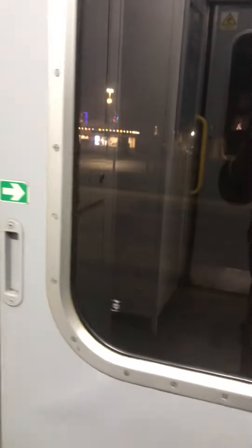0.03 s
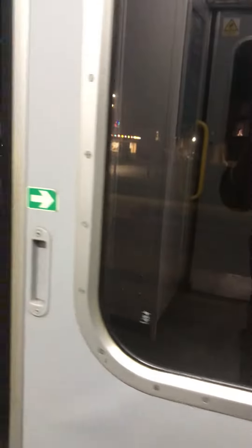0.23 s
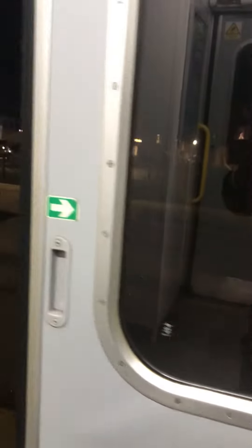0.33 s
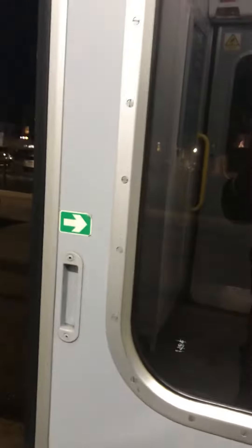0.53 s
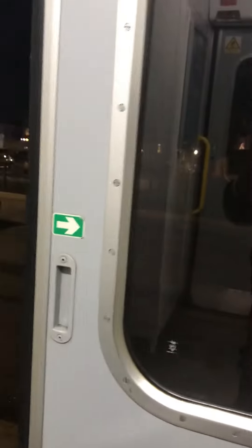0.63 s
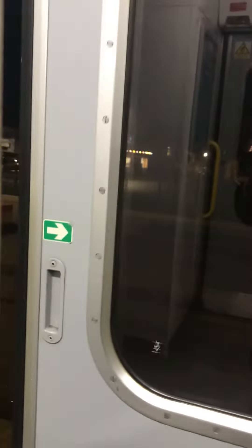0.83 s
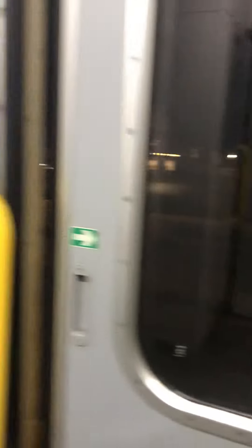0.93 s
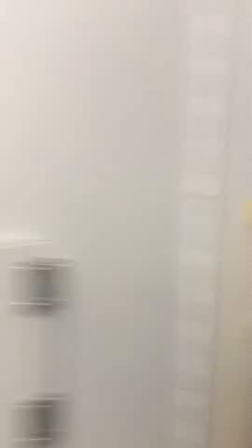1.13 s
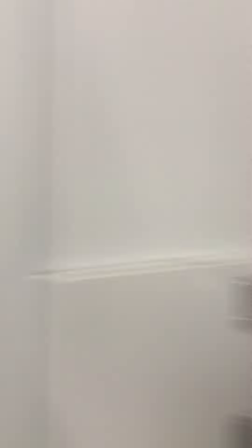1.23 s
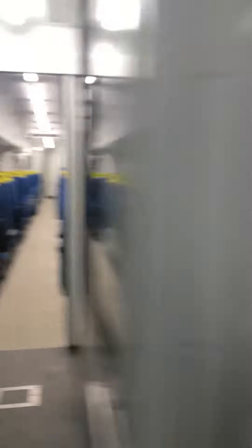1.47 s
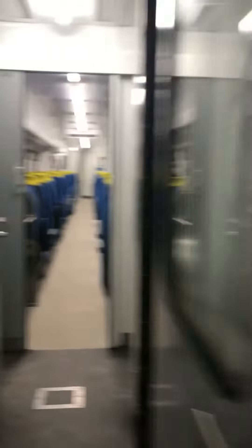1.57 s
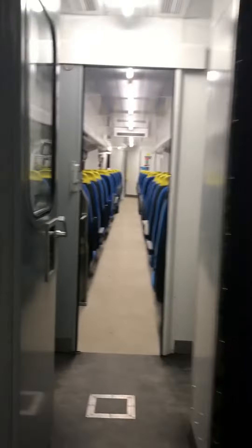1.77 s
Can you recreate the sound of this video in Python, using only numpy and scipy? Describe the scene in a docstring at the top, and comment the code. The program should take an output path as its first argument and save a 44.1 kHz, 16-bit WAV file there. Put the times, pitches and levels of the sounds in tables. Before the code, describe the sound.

Powered train door hisses, clunks and slams closed over the idling train's rumble.

```python
"""Train vestibule door closing

A powered door slides shut in a hiss of air from its drive, over the rumble and drone of the idling train.
It scuffs along its track, clunks, knocks once more, then squeezes its seal and slams home; the latch
rattles, the air is choked off and the train sounds quieter. Blows are bursts of coloured noise with a
short room tail; the metal and the door panel ring on in damped modes."""
import sys
import numpy as np
from scipy import signal
from scipy.fft import rfft, irfft, next_fast_len
from scipy.io import wavfile
from scipy.ndimage import map_coordinates

SR = 44100
rng = np.random.default_rng(int(sys.argv[2]) if len(sys.argv) > 2 else 0)


def wav_out(sig):
    """Save sig, one row per channel (or a flat mono array), as 16-bit PCM at SR to the path in sys.argv[1]."""
    wavfile.write(sys.argv[1], SR, np.round(np.clip(np.atleast_2d(sig).T, -1, 1) * 32767).astype(np.int16))


N = 79380
T = np.arange(N) / SR


def amp(db):
    """Decibels to gain."""
    return 10 ** (np.asarray(db) / 20)


def unit(x):
    """Scale to rms 1."""
    return x / np.sqrt(np.mean(x ** 2) + 1e-20)


def along(points, hz):
    """Read (f/Hz, value) points on a log frequency axis."""
    f, v = np.transpose(points)
    return np.interp(np.log(hz + 1), np.log(f + 1), v)


def curves(rows):
    """One envelope for each column after the time."""
    times, *columns = np.transpose(rows)
    return [np.interp(T, times, column) for column in columns]


def wobble(rate):
    """A smooth random curve, rate knots a second."""
    return map_coordinates(rng.standard_normal(400), [T * rate + 2], mode="wrap")


def filtered(x, response):
    """Filter x by a gain given as a function of frequency."""
    size = next_fast_len(N + SR // 2)
    return irfft(rfft(x, size) * response(np.fft.rfftfreq(size, 1 / SR)), size)[:N]


def noise(colour):
    """Noise of rms 1; the colour's levels set only the shape of its spectrum."""
    return unit(filtered(rng.standard_normal(N), lambda hz: amp(along(colour, hz))))


def at(s, x):
    """Delay x by s seconds."""
    return np.pad(x, (round(s * SR), 0))[:N]


def train():
    """The idling train: rumble, roar and engine drone, quieter once the door is shut, and a faint hiss."""
    # swells of the deep rumble: t/s, level/dB
    rumble_level = [(0, -29.5), (.3, -25.5), (.6, -30.5), (.88, -24), (1.05, -33), (1.25, -23.5),
                    (1.58, -35.5), (1.8, -34)]
    # rumble spectrum: f/Hz, level/dB
    rumble_colour = [(18, -18), (30, -24), (40, 1), (58, 0.5), (80, -1.5), (120, -6.5), (160, -15.5),
                     (400, -57), (1000, -110)]
    # swells of the low-mid roar: t/s, level/dB
    roar_level = [(0, -38.5), (.1, -35), (.22, -41), (.4, -32), (.65, -40), (1.0, -39.5), (1.25, -37.5),
                  (1.58, -45), (1.8, -43)]
    # roar spectrum: f/Hz, level/dB
    roar_colour = [(80, -19), (160, -2), (240, -2.5), (420, -10.5), (620, -10), (850, -18), (1300, -21.5),
                   (2200, -32.5), (4000, -39), (8000, -56), (16000, -70)]
    # swells of the engine drone: t/s, level/dB
    drone_level = [(0, -41), (.12, -28.5), (.2, -32), (.39, -19), (.47, -32.5), (.75, -29), (1.03, -37),
                   (1.2, -29.5), (1.6, -55), (1.8, -60)]
    # cabin hiss, dipping after the slam: t/s, level/dB
    hiss_level = [(1.3, -56), (1.52, -68), (1.65, -56.5), (1.8, -56.5)]
    # cabin hiss spectrum: f/Hz, level/dB
    hiss_colour = [(1000, 2.5), (3500, 0.5), (5500, -6.5), (10000, -8.5), (15000, -15)]
    drone_hz, waver_db, drift_rad = 96.9, 3.5, 0.28
    drone_gain = np.sqrt(2) * amp(curves(drone_level)[0] + waver_db * wobble(22.1))
    drone = drone_gain * np.sin(2 * np.pi * drone_hz * T + drift_rad * wobble(14))
    rumble = amp(curves(rumble_level)[0]) * noise(rumble_colour)
    roar = amp(curves(roar_level)[0]) * noise(roar_colour)
    hiss = amp(curves(hiss_level)[0]) * noise(hiss_colour)
    return rumble + roar + drone + hiss


def wall_reflections(x):
    """Add eight close reflections off the vestibule's panels; the sum has rms 1."""
    delays_s = rng.uniform(.0008, .012, size=8)
    return unit(x + amp(-15) * sum(at(s, x) for s in delays_s))


def air_rush():
    """Air hisses from the door drive, duller as the pressure falls, until the seal chokes it."""
    # envelopes of the rush: t/s, body level/dB, fizz level/dB
    rush_levels = [(0, -40.5, -38.5), (.28, -41.5, -39.5), (.42, -38.5, -39.5), (.5, -40.5, -41),
                   (.66, -48.5, -48), (.88, -43, -45), (1.05, -46.5, -50), (1.22, -51, -57)]
    # spectrum of the hiss's body: f/Hz, level/dB
    body_colour = [(900, -4), (1500, -16), (2500, -5.5), (3600, -1), (5500, 1.5), (7000, -1.5), (7800, -15),
                   (11000, -38)]
    # spectrum of the fizz on top: f/Hz, level/dB
    fizz_colour = [(4000, -37), (7000, -9), (8300, 0.5), (9600, 1), (10500, -5), (12500, -1.5), (15500, -7)]
    # narrow whistles of the vent: f/Hz, half-width/Hz, relative level/dB
    vent_ports = [(5360, 40, -11), (7400, 87, -13.5)]
    sealed_s, choke_db_per_s, flutter_db = 1.36, 115, 1.2
    whistles = np.zeros(N)
    for hz, width, db in vent_ports:
        band = filtered(rng.standard_normal(N), lambda f: 1 / (1 + ((f - hz) / width) ** 2))
        whistles += amp(db) * unit(band)
    body = wall_reflections(noise(body_colour)) + amp(-2.5) * whistles
    fizz = wall_reflections(noise(fizz_colour))
    body_db, fizz_db = curves(rush_levels)
    choke_db = -choke_db_per_s * np.maximum(T - sealed_s, 0)
    return amp(choke_db + flutter_db * wobble(25.6)) * (amp(body_db) * body + amp(fizz_db) * fizz)


def friction(rubs, colour, grain_db):
    """Rubbing: grainy noise that swells to a peak and dies away at each rub."""
    swell = sum(amp(db) * np.exp(-np.maximum((s - T) / rise, (T - s) / fall))
                for s, db, rise, fall in rubs)
    return swell * unit(noise(colour) * amp(grain_db * wobble(210)))


def track_scuffs():
    """The sliding door rubs briefly on its track."""
    # scuffs along the travel: t/s, level/dB, rise/s, fall/s
    scuffs = [(.296, -35.5, .004, .008), (.328, -29, 0.0075, 0.032), (.755, -39, 0.018, 0.05),
              (1.175, -38.5, .006, .025), (1.21, -39.5, 0.0075, .02)]
    # scuff spectrum: f/Hz, level/dB
    scuff_colour = [(120, -5), (300, 5), (550, -3.5), (900, -6), (3500, -10.5), (8000, -15), (15000, -24)]
    return friction(scuffs, scuff_colour, grain_db=1.0)


def blow(colour, attack_s, hold_s, t60, room_db):
    """A contact: a noise burst stands for its dense resonances, then the vestibule's tail answers."""
    # the vestibule's reverb time: f/Hz, t60/s
    room_t60 = [(100, 0.59), (400, 0.58), (1500, 0.36), (4000, 0.38), (8000, 0.34), (15000, 0.28)]
    direct = noise(colour) * amp(-60 * np.maximum(T - hold_s, 0) / t60)
    hz, t, bands = signal.stft(noise(colour), SR, nperseg=256)
    band_decay = amp(-60 * t / along(room_t60, hz)[:, None])
    tail = signal.istft(bands * band_decay, SR, nperseg=256)[1][:N]
    return (direct + amp(room_db) * tail) * (1 - np.exp(-T / attack_s))


def ring(modes, attack_s, wander_rad):
    """A struck part rings in damped modes whose phases wander a little."""
    tones = np.zeros(N)
    for hz, db, t60 in modes:
        phase = 2 * np.pi * hz * T + wander_rad * wobble(min(hz / 6, 150))
        tones += amp(db - 60 * T / t60) * np.sin(phase)
    return tones * (1 - np.exp(-(T / attack_s) ** 2))


def clunk():
    """The mechanism strikes: metal rings, the door leaf booms, and a short bright spit follows."""
    # impact spectrum: f/Hz, level/dB
    strike_colour = [(100, -16), (260, -1.5), (400, -5), (500, 2), (650, -6.5), (950, -4.5), (1280, -0.5),
                     (1800, -3), (2100, -10.5), (2400, 0.5), (2900, -4), (3400, -17), (5000, -16),
                     (6500, -32), (15000, -39)]
    # modes of the mechanism's metal: f/Hz, level/dB, t60/s
    metal_modes = [(1165, -21, 0.21), (1241, -17, 0.14), (1282, -15, 0.13), (1334, -16, 0.11),
                   (1630, -22.5, 0.13), (1943, -22, 0.16), (2205, -20, 0.12), (2648, -12, 0.14),
                   (2660, -11, .09), (2652, -21, 0.3), (2745, -16, 0.18), (3654, -34.5, 0.27),
                   (5320, -23, .12)]
    # modes of the door leaf: f/Hz, level/dB, t60/s
    leaf_modes = [(97.57, -5.5, 0.51), (167.8, -22, 0.49), (265.6, -14.5, 0.2), (284, -17.5, 0.23),
                  (503, -16, 0.18), (545, -22, .22), (868, -22.5, 0.24)]
    # spit spectrum: f/Hz, level/dB
    spit_colour = [(3000, -13), (6300, -4), (7300, 5.5), (8300, -4), (9300, 2), (10500, -7), (13500, 1),
                   (15500, -6)]
    clunk_s, spit_s = .5095, .559
    strike = amp(-12.5) * blow(strike_colour, attack_s=.0018, hold_s=.01, t60=.072, room_db=-9)
    metal = ring(metal_modes, attack_s=.004, wander_rad=.55)
    boom = ring(leaf_modes, attack_s=.015, wander_rad=.12)
    spit = amp(-26) * blow(spit_colour, attack_s=.00091, hold_s=.0027, t60=.032, room_db=-8)
    return at(clunk_s, strike + metal + boom) + at(spit_s, spit)


def knock():
    """A lighter metal knock further along the travel."""
    # impact spectrum: f/Hz, level/dB
    strike_colour = [(150, -1), (400, -12.5), (780, -17.5), (1000, 0), (1330, -15), (1680, 0.5),
                     (2200, -12), (2700, -8.5), (3200, -22), (4100, -19), (5500, -21.5), (7000, -31),
                     (15000, -34)]
    # modes of the knocked metal: f/Hz, level/dB, t60/s
    metal_modes = [(1012, -22.5, 0.19), (1038, -22.5, .13), (1654, -18.5, 0.12), (1759, -23.5, 0.18),
                   (1810, -24, 0.21), (2690, -36, 0.19)]
    knock_s = .8088
    strike = amp(-22) * blow(strike_colour, attack_s=.00065, hold_s=.011, t60=.11, room_db=-8)
    metal = ring(metal_modes, attack_s=.004, wander_rad=.42)
    return at(knock_s, strike + metal)


def seal_squeeze():
    """The rubber seal rubs as it is squeezed just ahead of the slam."""
    # squeezes of the seal: t/s, level/dB, rise/s, fall/s
    squeezes = [(1.234, -30.5, 0.013, .03), (1.257, -16.5, 0.0061, .004)]
    # spectrum of the rubbing rubber: f/Hz, level/dB
    rubber_colour = [(300, -5.5), (700, -8.5), (1000, -1.5), (1500, -7), (2000, -16), (4000, -24),
                     (12000, -41)]
    return friction(squeezes, rubber_colour, grain_db=1.5)


def slam():
    """The door cracks against the frame, thuds and shudders, then rocks back against it and settles."""
    # the door edge meeting the frame: t/s, level/dB
    edge_hits = [(1.2582, -7), (1.2620, -10)]
    # spectrum of the edge's crack: f/Hz, level/dB
    crack_colour = [(400, -23), (900, -8), (1350, 5), (2000, 2.5), (2600, -18), (4000, -22), (8000, -26),
                    (15000, -36)]
    # main impact spectrum: f/Hz, level/dB
    strike_colour = [(100, 2), (300, 2.5), (480, 0.5), (650, -5), (950, -4), (1350, -1.5), (2000, -9),
                     (2700, -11), (4000, -15.5), (5300, -24), (7500, -23.5), (11000, -29), (15000, -41)]
    # spectrum of the low thud: f/Hz, level/dB
    thud_colour = [(60, -14), (130, -8.5), (200, 5.5), (310, -0.5), (420, -9.5), (600, -14), (800, -16),
                   (2000, -44), (5000, -90)]
    # modes of the slammed panel: f/Hz, level/dB, t60/s
    panel_modes = [(36.3, -12, 0.63), (53.24, -6, 0.49), (87.3, -7.5, .38), (166.7, -20, 0.57),
                   (196.7, -10.5, .36), (254.5, -16.5, 0.41), (334.3, -14.5, 0.31), (492, -18.5, 0.34),
                   (688, -26, 0.41), (871, -24, .24), (1161, -25, 0.46), (1450, -29, 0.19),
                   (1630, -24.5, 0.32), (1750, -27, 0.34)]
    slam_s, settle_s = 1.2575, 1.4
    cracks = np.zeros(N)
    for s, db in edge_hits:
        crack = blow(crack_colour, attack_s=.00037, hold_s=.0012, t60=.011, room_db=-22)
        cracks += at(s, amp(db) * crack)
    strike = amp(-15) * blow(strike_colour, attack_s=.003, hold_s=.011, t60=.066, room_db=-3)
    thud = amp(-17) * blow(thud_colour, attack_s=.005, hold_s=.03, t60=.17, room_db=.5)
    shudder = ring(panel_modes, attack_s=.036, wander_rad=.36)
    settle = amp(-13) * ring(panel_modes, attack_s=.025, wander_rad=.79)
    return cracks + at(slam_s, strike + thud + shudder) + at(settle_s, settle)


def latch_rattle():
    """The latch bounces, each contact a sharp tick, a tinny clack and the plate singing on."""
    # latch bounces: t/s, clack and plate level/dB, tick level/dB
    bounces = [(1.291, -32, -24), (1.298, -17, -30), (1.3404, -20.5, -31), (1.4025, -28, -39),
               (1.439, -30.5, -41.5), (1.548, -67, -56)]
    # clack spectrum: f/Hz, level/dB
    clack_colour = [(700, 0.5), (1800, -5), (2600, -6), (3450, 2), (3900, -3), (4400, -3), (5100, -18),
                    (8000, -19), (15000, -36)]
    # tick spectrum: f/Hz, level/dB
    tick_colour = [(2000, 2), (5000, -2), (8000, -5), (10500, -10), (13500, 3), (15500, -10)]
    # spectrum of the ringing latch plate: f/Hz, level/dB
    plate_colour = [(2400, -32), (3100, -11), (3400, 4), (3800, -5), (4300, -6), (5000, -30), (8000, -60)]
    plate_t60_s = .37
    rattle = np.zeros(N)
    for s, clack_db, tick_db in bounces:
        clack = blow(clack_colour, attack_s=.0005, hold_s=.003, t60=.035, room_db=-10)
        tick = blow(tick_colour, attack_s=.0002, hold_s=.0012, t60=.01, room_db=-17)
        plate = amp(-16.5) * noise(plate_colour) * amp(-60 * T / plate_t60_s)
        rattle += at(s, amp(clack_db) * (clack + plate) + amp(tick_db) * tick)
    return rattle


def scene():
    """The whole closing in mono, heard from beside the door."""
    mix = train() + air_rush() + track_scuffs() + clunk() + knock()
    return (mix + seal_squeeze() + slam() + latch_rattle())[None]


def record(dry):
    """Soft-clip the highest peaks and cut the very top of the treble."""
    top_hz = 15800
    rounded = dry[0] / (1 + np.abs(dry[0]) ** 8) ** (1 / 8)
    return filtered(rounded, lambda hz: hz < top_hz)[None]


dry = scene()
out = record(dry)
wav_out(out)
```